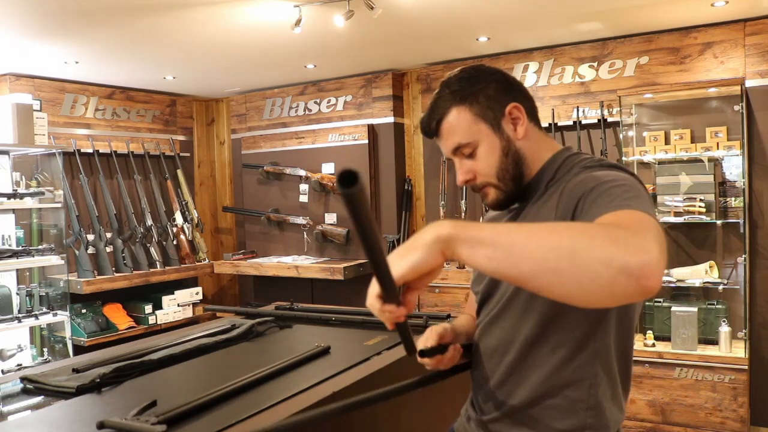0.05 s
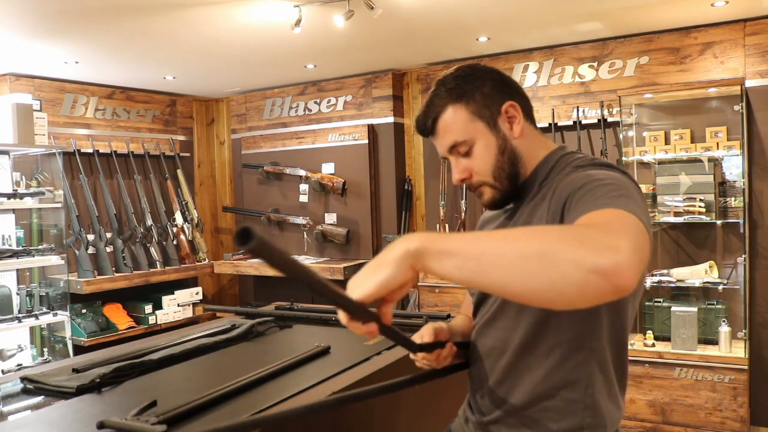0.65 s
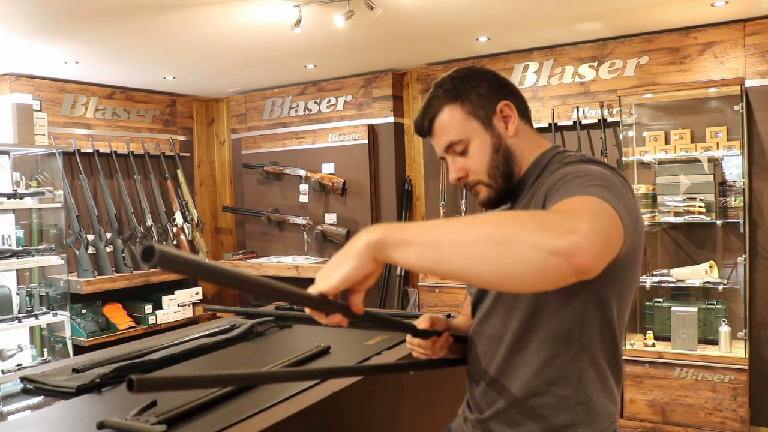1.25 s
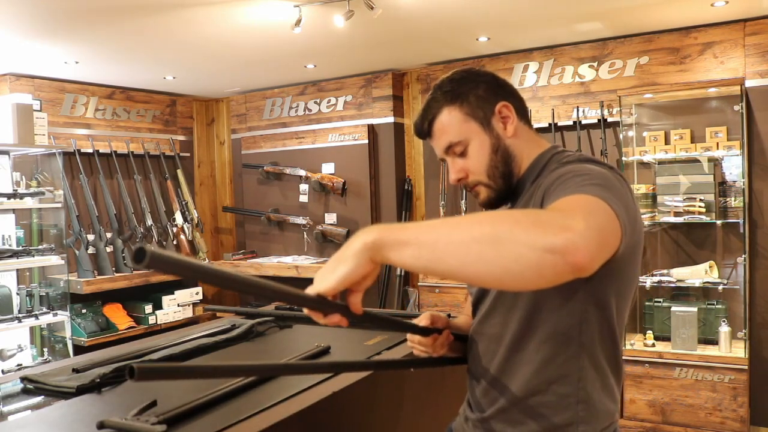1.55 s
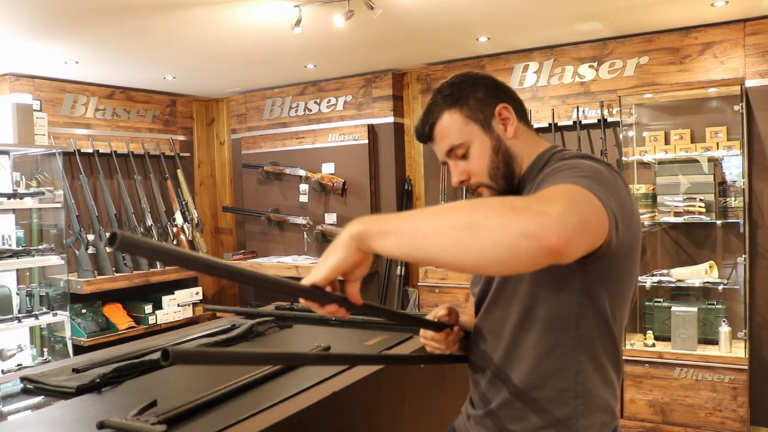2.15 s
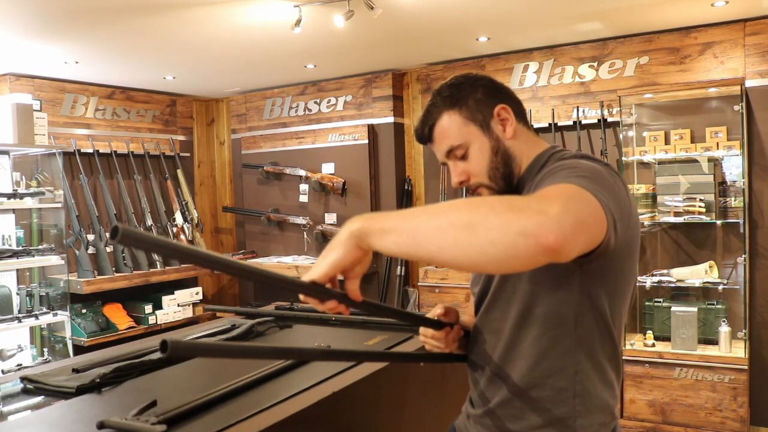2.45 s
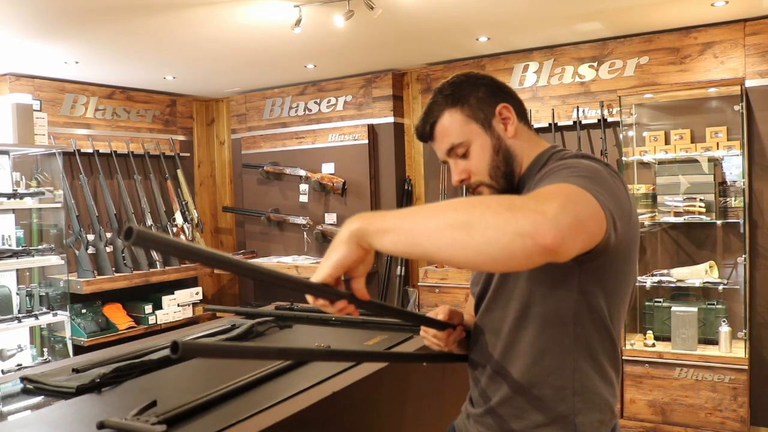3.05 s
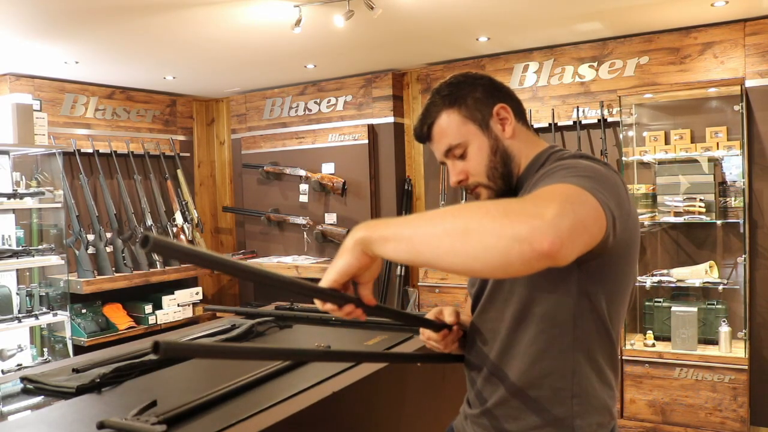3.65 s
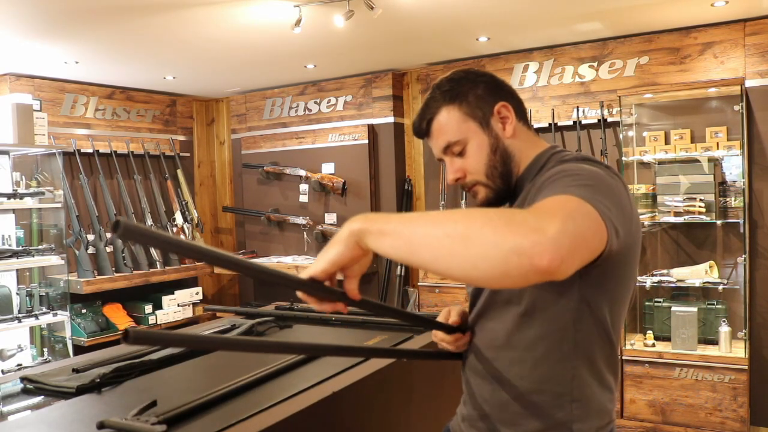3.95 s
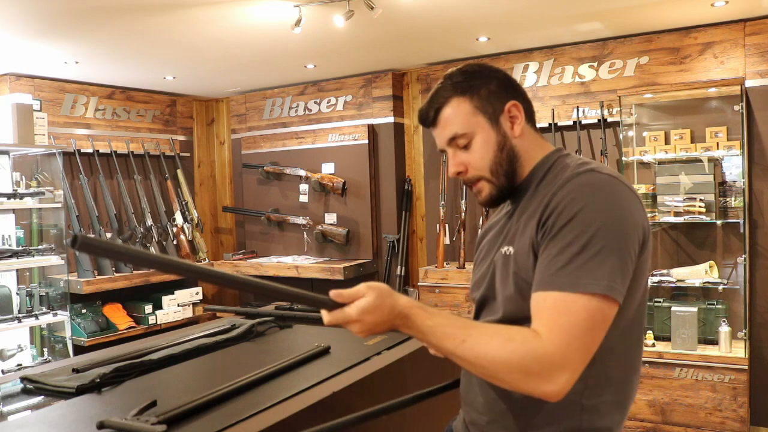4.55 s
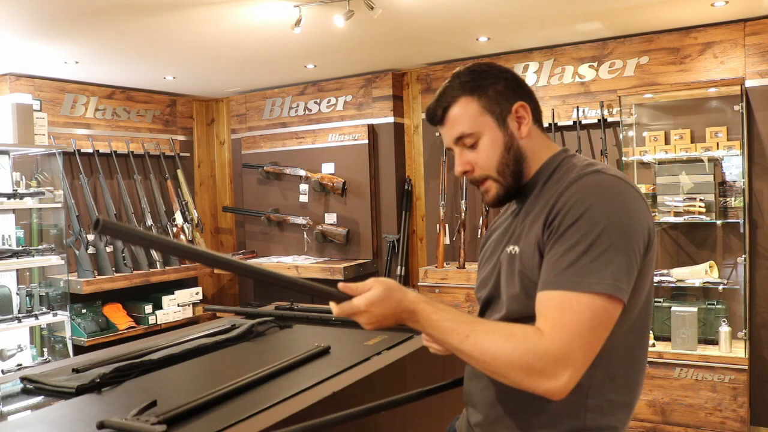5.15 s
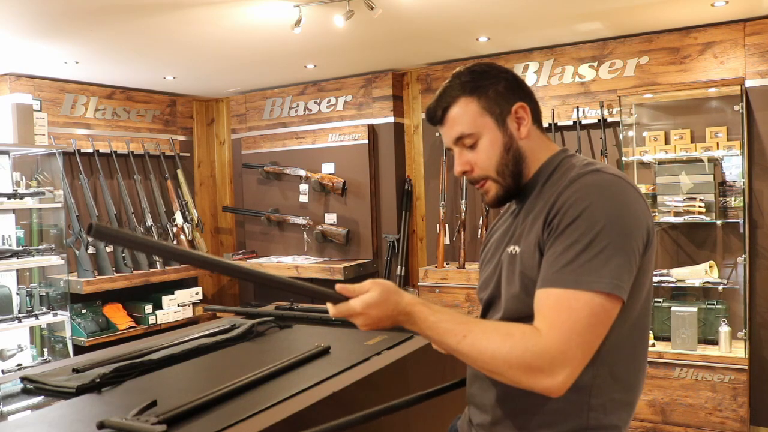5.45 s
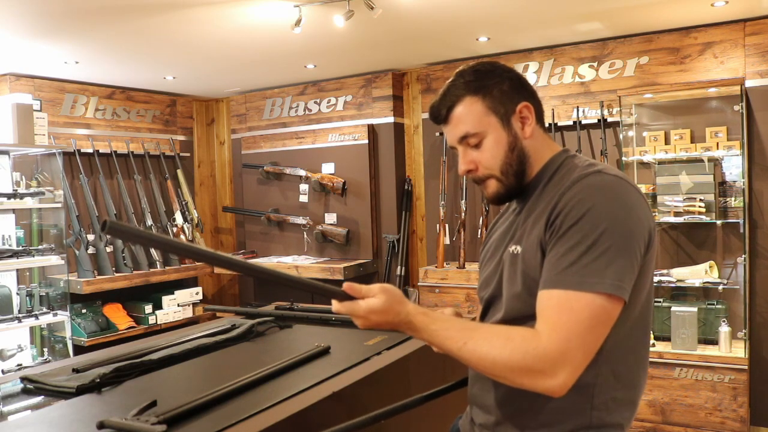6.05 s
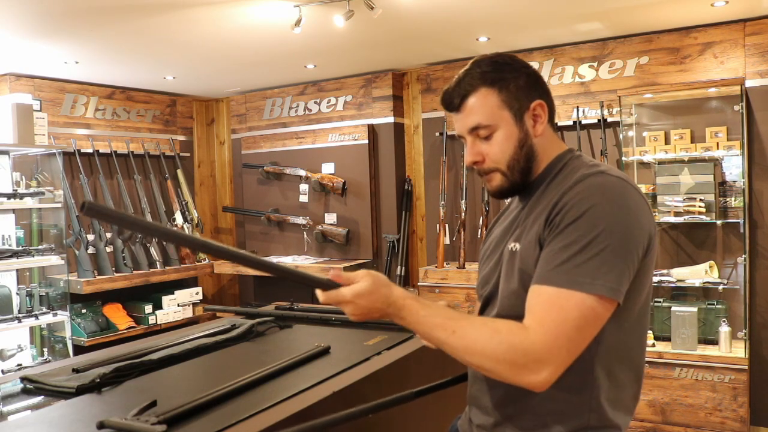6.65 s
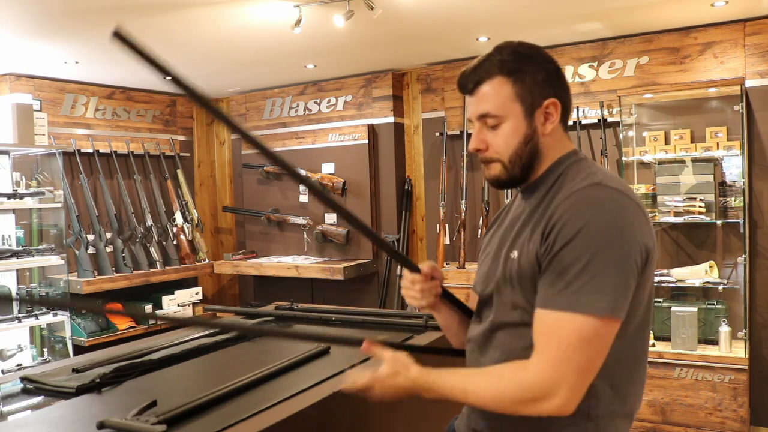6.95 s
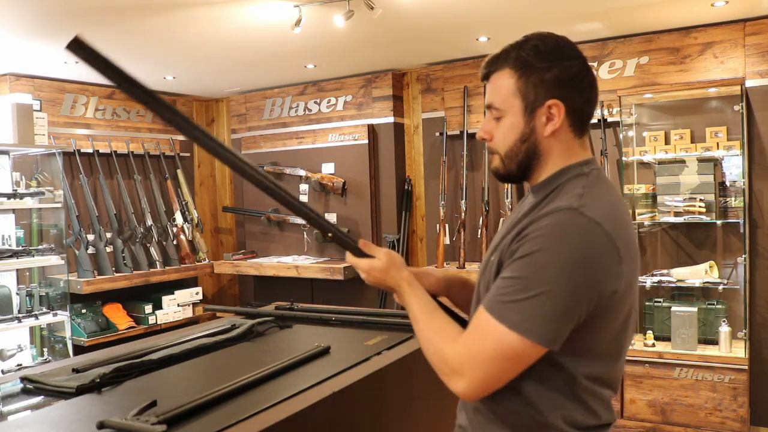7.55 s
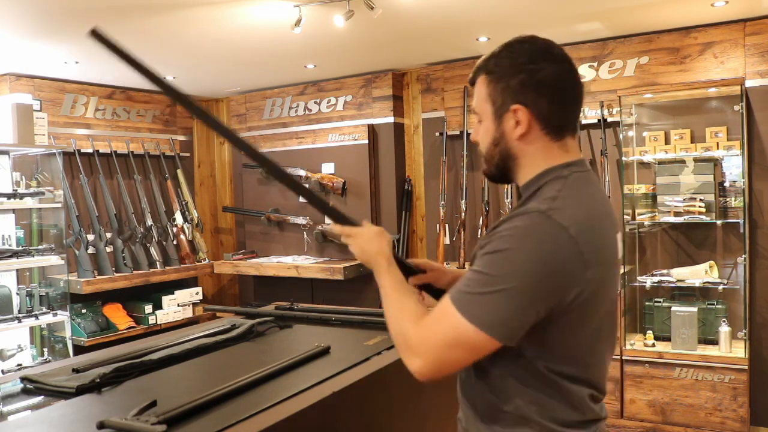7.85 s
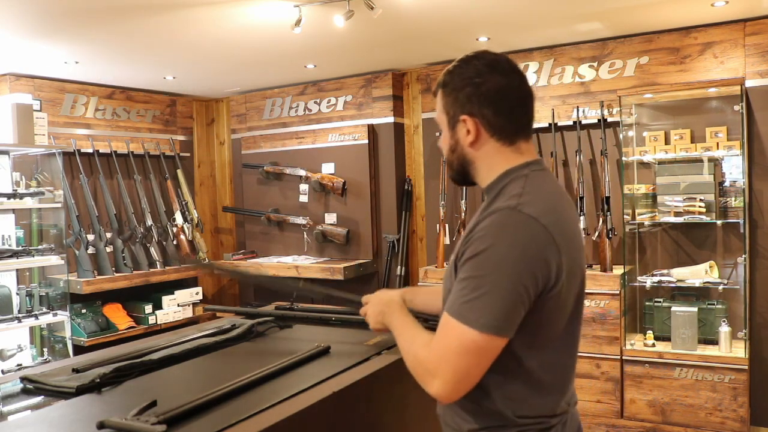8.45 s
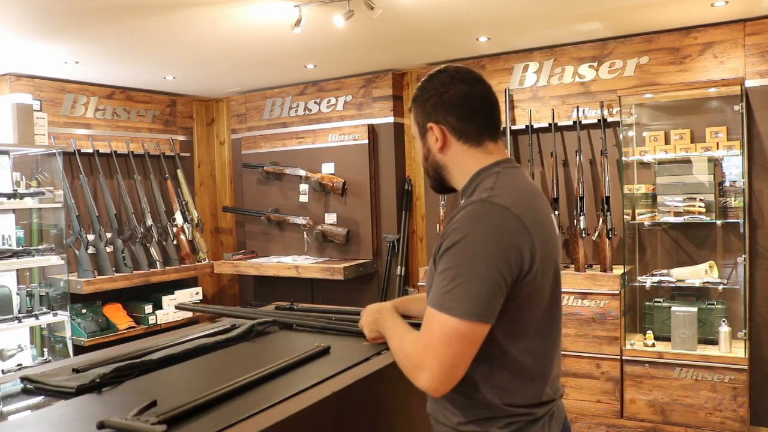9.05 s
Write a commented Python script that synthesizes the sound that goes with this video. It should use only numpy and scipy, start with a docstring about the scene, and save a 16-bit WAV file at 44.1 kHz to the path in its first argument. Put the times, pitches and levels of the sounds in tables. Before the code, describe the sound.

Over a quiet ventilation hum in a slightly reverberant shop, light metal tubes knock and scrape inside one another, heard from a metre or two away. Small plastic clicks and soft cloth rubs follow as the sections are adjusted. A clip shuts with a loud snap, the legs meet in a bright clap, and after a few more slides they are set down on a padded counter.

```python
"""Telescopic sticks are put together by hand in a wood-panelled shop, a metre or two away.
Ventilation hums throughout, and the room reverberates for over half a second. From the start, light
tubes slide in each other with stick-slip friction and knock, ringing in their modes. From 2 s plastic
clips click, and at 6.4 s one snaps shut. At 7.6 s the legs clap together, and near 9.2 s the bundle
is laid on a padded counter, exciting its low modes."""
import sys
import numpy as np
from scipy import signal
from scipy.fft import rfft, irfft
from scipy.io import wavfile
from scipy.ndimage import uniform_filter1d

SR = 44100
rng = np.random.default_rng(int(sys.argv[2]) if len(sys.argv) > 2 else 0)


def store_wav(level_fs):
    """Save 16-bit WAV to argv[1]."""
    pcm = np.round(np.clip(np.atleast_2d(level_fs), -1, 1) * 32767)
    wavfile.write(sys.argv[1], SR, pcm.T.astype(np.int16))


N = 409688
EVENT_T = np.arange(2 ** 15) / SR  # time axis of one event [s]
HIT_GAIN = np.sqrt(.02 * SR)  # a hit's level is its energy spread over 20 ms


def undb(db):
    """Decibels to amplitude ratio."""
    return 10 ** (np.asarray(db) / 20)


def unit(x):
    """Normalise each channel to unit energy."""
    return x / np.sqrt(np.sum(x ** 2, axis=-1, keepdims=True) + 1e-18)


def along(points, hz):
    """Interpolate (frequency, value) points on a logarithmic frequency axis."""
    f, value = np.transpose(points)
    return np.interp(np.log(np.maximum(hz, 1)), np.log(f), value)


def freqs(x):
    """Frequencies of the Fourier spectrum of x."""
    return np.fft.rfftfreq(x.shape[-1], 1 / SR)


def colour(x, db):
    """Minimum-phase filter with the given gain at each frequency."""
    n = x.shape[-1]
    cepstrum = irfft(np.log(undb(db)), n)
    cepstrum[1:n // 2] *= 2
    cepstrum[n // 2 + 1:] = 0
    return irfft(rfft(x) * np.exp(rfft(cepstrum, n)), n)


def resonance(hz, centre_hz, width):
    """Band-pass response in dB; width is a fraction of the centre frequency."""
    ratio = np.maximum(hz, 1) / centre_hz
    return np.maximum(-20 * np.log10(1 + ((ratio - 1 / ratio) / width) ** 2), -80)


def spread(mid, side, coherence):
    """Sum and difference of independent signals give two partly coherent channels."""
    c = np.clip(coherence, 0, 1)
    m, s = rfft(mid) * np.sqrt((1 + c) / 2), rfft(side) * np.sqrt((1 - c) / 2)
    return irfft(np.array([m + s, m - s]), len(mid))


def pan(db):
    """Channel gains for a level difference, left minus right."""
    return undb(np.array([[db], [-db]]) / 2)


def add(out, start, x):
    """Superpose x on out from start [s]."""
    i = max(int(start * SR), 0)
    out[:, i:i + x.shape[-1]] += x[:, :max(N - i, 0)]


def waver(t, rate):
    """Random modulation: rate Gaussian values a second, linearly interpolated."""
    return np.interp(t * rate, np.arange(2 ** 10), rng.standard_normal(2 ** 10))


def mode(t, hz, t60):
    """Free vibration of a damped oscillator, with unit energy."""
    return unit(np.sin(2 * np.pi * (hz * t + rng.random())) * undb(-60 * t / t60))


# likeness of the channels in a diffuse field: (frequency [Hz], coherence [0-1])
COHERENCE = [(60, .94), (130, 0.7), (300, 0.47), (640, 0.58), (1400, 0.32), (3000, 0), (15000, 0)]

def diffuse(n):
    """Diffuse field: white noise from all directions, most coherent at long wavelengths."""
    mid, side = rng.standard_normal((2, n))
    return spread(mid, side, along(COHERENCE, freqs(mid)))


# ventilation noise: (frequency [Hz], relative spectral density [dB])
VENT_SPECTRUM = [(12, -36), (20, 1.5), (44, -9), (74, -6), (158, -10.5), (204, -15), (434, -12.5),
                 (499, -12.5), (825, -19), (1030, -18), (2140, -20), (3340, -21), (4540, -23.5),
                 (13900, -30.5), (16000, -41)]

def ventilation(noise_db=-52.47, hum_hz=48.4, hum_db=-62.0, waver_db=2):
    """Stationary broadband rumble and hiss, with an amplitude-modulated hum."""
    noise = diffuse(N)
    noise = unit(colour(noise, along(VENT_SPECTRUM, freqs(noise)))) * np.sqrt(N) * undb(noise_db)
    noise = signal.sosfilt(signal.butter(2, 28, "high", fs=SR, output="sos"), noise)
    t = np.arange(N) / SR
    hum = np.sqrt(2) * undb(hum_db + waver_db * waver(t, rate=8.8)) * np.sin(2 * np.pi * hum_hz * t)
    return pan(-1.5) * (noise + hum)


# reverberation time of the shop: (frequency [Hz], T60 [s])
SHOP_T60 = [(100, 0.23), (500, 0.79), (1300, 0.61), (3000, 0.63), (5500, 0.65), (8000, 0.59), (11000, 0.44),
            (16000, 0.3)]

def reverberation(x, wet_db=-0.5, delay_s=0.003, build_s=0.0016, early_db=7):
    """Discrete reflections from counter, ceiling and glass merge into an exponential diffuse decay."""
    t = np.arange(SR) / SR
    hz = freqs(t)
    sparse = undb(early_db * np.exp(-t / 0.022) * rng.standard_normal(SR))
    sparse = sparse / np.sqrt(uniform_filter1d(sparse ** 2, size=400))
    spectrum = rfft(diffuse(SR) * sparse)
    centres = np.transpose(SHOP_T60)[0]
    tail = 0
    for centre, t60 in SHOP_T60:
        band = irfft(spectrum * along(np.c_[centres, centres == centre], hz), SR)
        tail += band * undb(-60 * t / t60)
    tail = unit(tail * (1 - np.exp(-np.maximum(t - delay_s, 0) / build_s)))
    tail = colour(tail, along([(200, -2), (2000, 0), (10000, -1)], hz))
    return undb(wet_db) * signal.fftconvolve(x, tail, axes=1)[:, :N]


# hands and sleeves rub over the tubes: (start [s], end [s], level [dB])
RUBS = [(0.572, 0.718, -59), (2.313, 2.42, -56), (2.562, 2.74, -61.5), (2.804, 3.022, -65),
        (4.966, 5.106, -69), (5.304, 5.58, -66), (8.198, 8.4, -59.5)]
# rubbed cloth: (frequency [Hz], gain [dB])
CLOTH_SPECTRUM = [(50, 1), (130, 11), (400, 9.5), (1400, 0.5), (2200, -16), (4000, -26), (12000, -37)]

def rustles(gain_db=1.5, crumple_db=3, fold_rate=110):
    """Soft, uneven friction noise swells and fades with each move of the arm."""
    out, t = np.zeros((2, N)), EVENT_T
    for start, end, db in RUBS:
        length = max(end - start, .02)
        swell = np.sin(np.pi * np.minimum(t / length, 1))
        rub = diffuse(len(t)) * undb(crumple_db * waver(t, fold_rate)) * swell
        rub = unit(colour(rub, along(CLOTH_SPECTRUM, freqs(t)))) * np.sqrt(length * SR)
        add(out, start, undb(db + gain_db) * pan(-1.0) * rub)
    return out


def thud(t, hz, t60):
    """A cushioned impact excites a band of decaying noise and one mode of the struck body."""
    dull = unit(colour(diffuse(len(t)) * undb(-60 * t / t60), resonance(freqs(t), hz, width=0.66)))
    note = mode(t, hz, t60) * (1 - np.exp(-t / 0.01))
    return pan(-1.1) * unit(dull + 1.3 * note)


# dull bumps of hands and legs: (time [s], level [dB], frequency [Hz])
SOFT_HITS = [(0.632, -44, 247), (0.633, -49.5, 116), (8.252, -48, 337), (8.797, -42.5, 293),
             (8.824, -42.5, 163.7), (9.1, -43, 105)]

def bumps(t60_cycles=63):
    """Constant-Q damping: every bump decays over the same number of cycles."""
    out = np.zeros((2, N))
    for start, db, hz in SOFT_HITS:
        add(out, start, undb(db) * thud(EVENT_T, hz, t60_cycles / hz))
    return HIT_GAIN * out


# modes of the padded counter: (frequency [Hz], level [dB], T60 [s])
COUNTER_MODES = [(97, -33.5, 0.85), (140.3, -36, 0.55), (325, -40.5, 0.15), (673, -33.5, 0.12),
                 (772, -43, 0.1)]

def counter(landing_s=9.162, lag_cycles=2.13):
    """Modal response to the landing bundle; each mode answers a few cycles late."""
    out = np.zeros((2, N))
    for hz, db, t60 in COUNTER_MODES:
        add(out, landing_s + lag_cycles / hz, undb(db) * thud(EVENT_T, hz, t60))
    return HIT_GAIN * out


def chatter(t, decay_s, grain_db, rise_s=0.00012):
    """Broadband excitation: a burst of tiny uneven contacts, equalised to a flat spectrum."""
    burst = rng.standard_normal(len(t)) * undb(grain_db * np.clip(rng.standard_normal(len(t)), -1, 1))
    burst = burst * np.exp(-t / decay_s) * (1 - np.exp(-t / rise_s))
    power = uniform_filter1d(np.abs(rfft(burst)) ** 2, size=700)
    return unit(colour(burst, -10 * np.log10(power + 1e-18)))


def beating(t, hz, t60, split):
    """Nested sections vibrate at nearly equal frequencies and beat."""
    triplet = (-1, .6), (0, 1), (1.3, .6)
    return unit(sum(share * mode(t, hz * (1 + split * step), t60) for step, share in triplet))


# body, knock, edge and treble of a hit: (lower limit [Hz], upper limit [Hz])
HIT_BANDS = [(250, 900), (900, 2000), (2000, 5000), (5000, 15000)]

def impact(t, hardness_db, chatter_s, body, spectrum, shares, *,
           modes_db, detune, ring_hz, ring_db, ring_t60, split, coherence, rise_s):
    """Chattering contact excites a body's modes; the grip detunes them and soon damps the strongest."""
    hz, chatter_s = freqs(t), max(chatter_s, 1e-4)
    modes = 0
    for f, db, t60 in body:
        amplitude = undb(db + rng.standard_normal())
        modes += amplitude * mode(t, f * (1 + detune * rng.standard_normal()), t60)
    ringing = undb(modes_db) * modes + undb(ring_db) * beating(t, ring_hz, ring_t60, split)
    ringing *= 1 - np.exp(-2 * t / chatter_s)
    mid = chatter(t, chatter_s, grain_db=12.5, rise_s=rise_s)
    side = chatter(t, 0.28 * chatter_s, grain_db=3.5, rise_s=rise_s)
    contact = spread(mid, side, coherence + along(COHERENCE, hz))
    hit = colour(contact + ringing, along(spectrum, hz))
    # the harder the contact, the more energy goes to the upper bands
    power = np.mean(np.abs(rfft(hit)) ** 2, axis=0) * 2 / len(t)
    gains = []
    for (lo, hi), (share_db, slope) in zip(HIT_BANDS, shares):
        band_db = 10 * np.log10(power[(hz > lo) & (hz < hi)].sum())
        gain_db = share_db + slope * hardness_db - band_db
        gains += [(lo * 1.2, gain_db), (hi / 1.2, gain_db)]
    return colour(hit, along(gains, hz))


# clips and collars click: (time [s], level [dB], hardness [dB], chatter decay [s])
CLIP_HITS = [(2.127, -41, 3, 0.014), (2.471, -51, 4.5, 0.013), (2.593, -48, 10.5, 0.015),
             (3.174, -52, -14, 0.006), (3.376, -44.5, -10, 0.024), (4.475, -49, -30, 0.0016),
             (4.593, -44.5, 4, 0.0057), (5.647, -40.5, 2.5, 0.0033), (5.662, -52, 7, 0.003),
             (5.93, -45.5, 10.5, 0.0065), (6.4219, -26.5, 10, 0.0049), (7.103, -46, -12, 0.002),
             (7.13, -46, -8.5, 0.0036), (8.254, -44.5, -17, 0.008), (8.804, -54, 4, 0.0026),
             (9.032, -45.5, -5, 0.029), (9.121, -49, -11, 0.0033), (9.165, -33, -5.5, 0.0087)]
# modes of a clip: (frequency [Hz], level [dB], T60 [s])
CLIP_MODES = [(1340, -30, 0.048), (1640, -16.5, 0.031), (2547, -4.5, 0.0075), (2810, -5.5, 0.01),
              (3020, -13.5, 0.013), (4580, -14.5, 0.026), (7440, -6, 0.013), (8650, -41, 0.0071)]
# contact on plastic: (frequency [Hz], gain [dB])
CLIP_SPECTRUM = [(60, -33), (250, -11), (600, -2), (1150, -6), (1700, -2), (2100, -3), (2650, -1),
                 (3900, 0), (4600, -1), (5500, -1), (7800, -1), (10500, -5), (13000, -10.5), (16000, -41)]
# click energy in each of HIT_BANDS: (share [dB], slope with hardness [dB/dB])
CLIP_BANDS = [(-13.5, 0), (-5.5, 0.0065), (-0.5, 0), (-2, 0.83)]

def clicks(gain_db=-1):
    """Impacts on plastic clips excite heavily damped modes."""
    out = np.zeros((2, N))
    for start, db, hardness_db, chatter_s in CLIP_HITS:
        click = impact(EVENT_T, hardness_db, chatter_s, CLIP_MODES, CLIP_SPECTRUM, CLIP_BANDS,
                       modes_db=1, detune=0.01, ring_hz=2550, ring_db=-26.5, ring_t60=0.04,
                       split=0.011, coherence=0.34, rise_s=0.0011)
        add(out, start, undb(db + gain_db) * pan(-1.7) * click)
    return HIT_GAIN * out


# hard second contacts: (time [s], level [dB], centre [Hz], width [fraction of centre])
HARD_HITS = [(1.586, -32.5, 1800, 0.27), (2.472, -51, 2250, 0.013), (2.594, -44, 4900, 0.26),
             (5.663, -45.5, 2090, 0.078), (5.932, -47.5, 6850, 0.03), (6.4212, -35, 1350, 0.25),
             (6.4222, -35, 2830, 0.32), (6.4247, -31, 4580, 0.078), (6.426, -20, 9400, 0.64),
             (6.428, -24.5, 8300, 0.45), (7.557, -20, 9500, 1.2), (7.562, -27, 1345, 0.15),
             (7.5633, -23, 8900, 0.6), (7.569, -26, 3700, 0.53)]

def snaps(gain_db=-1):
    """As a clip seats or the legs meet, a near-impulse excites one resonance."""
    out, t = np.zeros((2, N)), EVENT_T
    for start, db, hz, width in HARD_HITS:
        mid, side = chatter(t, 0.00022, grain_db=3.5), chatter(t, 0.00035, grain_db=6)
        tick = spread(mid, side, 0.092 + along(COHERENCE, hz))
        snap = unit(colour(tick, resonance(freqs(t), hz, width)))
        add(out, start, undb(db + gain_db) * pan(-2.3) * snap)
    return HIT_GAIN * out


# a section slides in its sleeve: (start [s], end [s], final level [dB], treble tilt [dB/octave])
STROKES = [(0.0, 0.043, -48, -5.5), (0.772, 0.8, -50.5, 3), (1.117, 1.18, -48, 2.5),
           (1.382, 1.406, -50, 2.5), (1.513, 1.578, -42, 1.5), (1.666, 1.708, -52, 0.5),
           (1.958, 2.035, -44.5, 0), (2.03, 2.133, -49.5, -7.5), (2.577, 2.606, -49.5, 6.5),
           (3.158, 3.19, -56, -3.5), (3.362, 3.412, -44.5, 1), (3.569, 3.67, -48.5, 1),
           (3.843, 4.12, -61.5, 6), (4.149, 4.3, -64, 2), (4.383, 4.43, -54, 3.5), (4.494, 4.54, -43, 0),
           (4.529, 4.65, -42, -0.5), (4.986, 5.05, -62, -6), (5.341, 5.56, -64, -1.5),
           (5.576, 5.663, -50, -0.5), (6.702, 6.753, -55.5, -2), (7.25, 7.45, -66, 3),
           (7.453, 7.564, -57, -2), (7.701, 7.893, -54.5, -1.5), (7.96, 8.066, -43, 1.5),
           (8.718, 8.81, -53, -3.5), (9.093, 9.193, -47, -1)]
# sliding friction: (frequency [Hz], gain [dB])
SCRAPE_SPECTRUM = [(100, -21), (700, -9), (1150, -1), (2400, 0.5), (4000, -3), (5000, -1.5), (5700, 0),
                   (7000, -1), (9000, -1.5), (12000, -7.5), (16000, -14)]
# the hand loosens and tightens on the tube: (time [s], ringing gain [dB])
GRIP_RING = [(1.7, 3), (1.95, -5), (3.3, -24), (7.45, -16), (7.7, 1), (8.7, -8)]
# modes of a leg, rubbed or struck: (frequency [Hz], level [dB], T60 [s])
TUBE_MODES = [(657, -39, 0.12), (964, -46.5, 0.089), (1153, -25.5, 0.16), (1336, -19.5, 0.07),
              (1698, -18.5, 0.12), (1832, -20, 0.53), (2280, -38, 0.17), (2604, -13, 0.078),
              (3382, -20, 0.26), (3646, -11, 0.091), (5355, -22, 0.37), (5520, -10.5, 0.081),
              (5900, -19, 0.07), (6750, -15.5, 0.14)]

def slides(gain_db=1.5, start_db=-53.5, tube_db=-1.5, grain_db=4, judder_db=2, judder_rate=160,
           grip_t60_ratio=0.42, speed_power=1.8, release_s=0.019, coast_db=-12, coast_s=0.02):
    """Stick-slip friction drives the gripped tube's modes; the louder strokes swell with speed."""
    out, t = np.zeros((2, N)), EVENT_T
    hz = freqs(t)
    treble_octaves = np.log2(np.maximum(hz, 1000) / 1000)
    tube = sum(undb(db + tube_db) * mode(t, f, grip_t60_ratio * t60) for f, db, t60 in TUBE_MODES)
    for start, end, db, tilt_db in STROKES:
        length = max(end - start, .01)
        slips = rng.standard_normal((2, len(t))) * undb(grain_db * rng.standard_normal((2, len(t))))
        slips = spread(*slips, coherence=0.46)
        # a loosely held tube sings, a tightly gripped one only hisses
        singing = undb(np.interp(start, *np.transpose(GRIP_RING))) * irfft(rfft(slips) * rfft(tube))
        scrape = colour(slips + singing, along(SCRAPE_SPECTRUM, hz) + tilt_db * treble_octaves)
        scrape = unit(scrape) * np.sqrt(len(t))
        speed, after = np.minimum(t / length, 1), np.maximum(t - length, 0)
        swell = np.interp(speed ** speed_power, [0, 1], undb([min(start_db, db), db]))
        judder = undb(judder_db * waver(t, judder_rate))
        run_out = np.maximum(np.exp(-after / release_s), undb(coast_db) * np.exp(-after / coast_s))
        gate = np.minimum(t / 0.0043, 1) * run_out
        add(out, start, undb(gain_db) * pan(-3.0) * scrape * swell * judder * gate)
    return out


# tubes collide: (time [s], level [dB], hardness [dB], strongest ring [Hz], chatter decay [s])
TUBE_HITS = [(0.486, -33.5, -17.5, 1238, 0.0078), (0.633, -31.5, -16.5, 1804, 0.0093),
             (0.795, -49, 1, 5520, 0.005), (0.975, -37, -12.5, 956, 0.0023), (1.167, -42, -24, 914, 0.0032),
             (1.467, -36, -18, 967, 0.0018), (1.582, -26, -16, 1680, 0.0049),
             (2.05, -48.5, -9, 1380, 0.006), (3.39, -42, -1.5, 1280, 0.0025),
             (3.648, -48.5, -16, 950, 0.0093), (4.399, -59, 4, 5300, 0.0044),
             (4.641, -44, 2.5, 1240, 0.0013), (7.557, -25, -0.5, 5355, 0.0069),
             (8.054, -40.5, -14, 1274, 0.0045), (8.132, -40, -4, 1312, 0.0038),
             (8.747, -50.5, -41, 1240, 0.003)]
# contact on a tube: (frequency [Hz], gain [dB])
TUBE_SPECTRUM = [(60, -17), (250, -10.5), (750, -2), (1100, 7.5), (2600, 0.5), (4000, -6.5), (5000, -6.5),
                 (5600, 10), (8000, 5.5), (10500, 0.5), (13000, -16), (16000, -16)]
# knock energy in each of HIT_BANDS: (share [dB], slope with hardness [dB/dB])
TUBE_BANDS = [(-22, -0.5), (0, 0), (2, 0.74), (-0.5, 1)]

def knocks(gain_db=-1):
    """Collisions between the light tubes excite their inharmonic modes."""
    out = np.zeros((2, N))
    for start, db, hardness_db, ring_hz, chatter_s in TUBE_HITS:
        knock = impact(EVENT_T, hardness_db, chatter_s, TUBE_MODES, TUBE_SPECTRUM, TUBE_BANDS,
                       modes_db=-6.5, detune=0.00098, ring_hz=ring_hz, ring_db=-11.0, ring_t60=0.037,
                       split=0.015, coherence=0.39, rise_s=0.0073)
        add(out, start, undb(db + gain_db) * pan(-0.49) * knock)
    return HIT_GAIN * out


def scene():
    """Superposition of direct sound, reverberant field and ventilation."""
    direct = knocks() + clicks() + snaps() + bumps() + counter() + slides() + rustles()
    return direct + reverberation(direct) + ventilation()


def record(dry):
    """Clipping at full scale, then an elliptic low-pass at 15.9 kHz."""
    return signal.sosfilt(signal.ellip(10, .2, 80, 15900, fs=SR, output="sos"), np.clip(dry, -1, 1))


dry = scene()
out = record(dry)
store_wav(out)
```